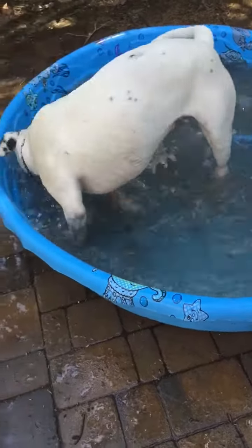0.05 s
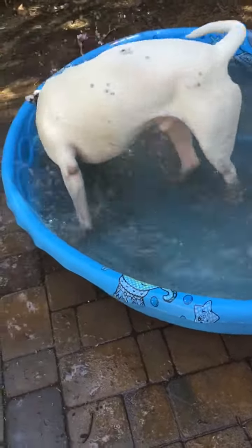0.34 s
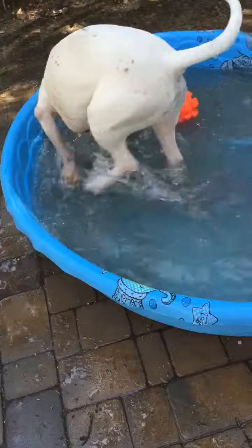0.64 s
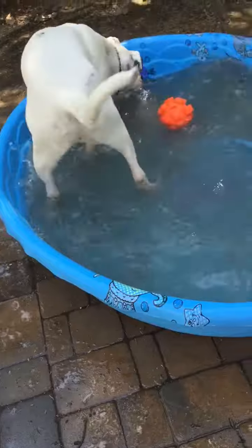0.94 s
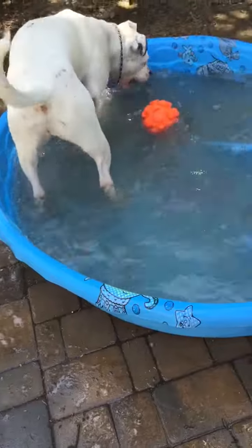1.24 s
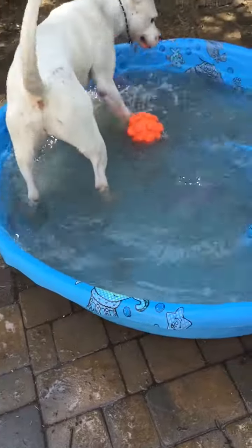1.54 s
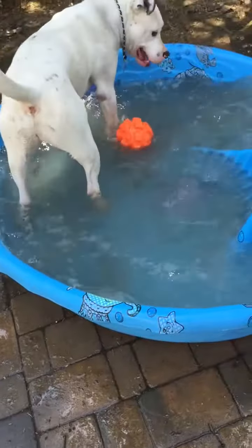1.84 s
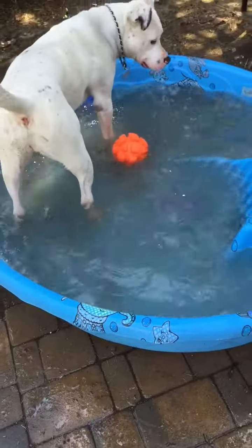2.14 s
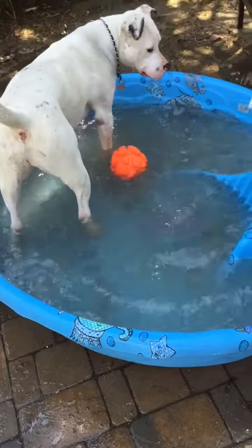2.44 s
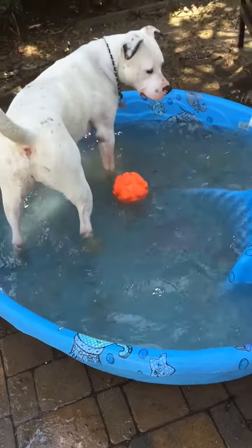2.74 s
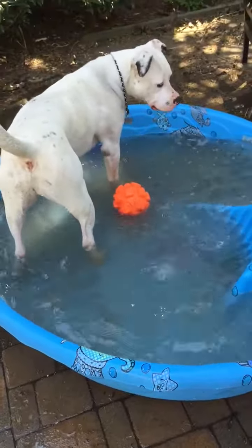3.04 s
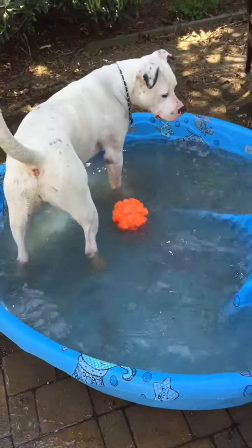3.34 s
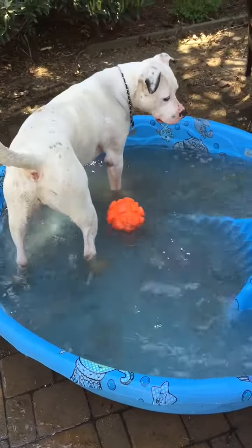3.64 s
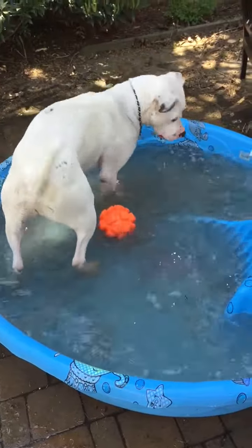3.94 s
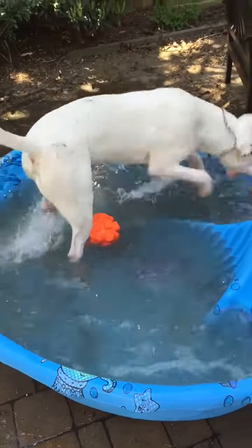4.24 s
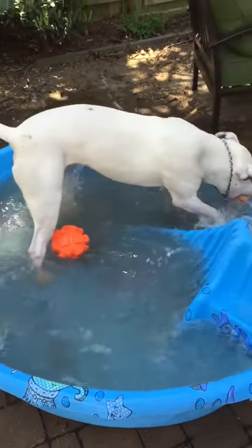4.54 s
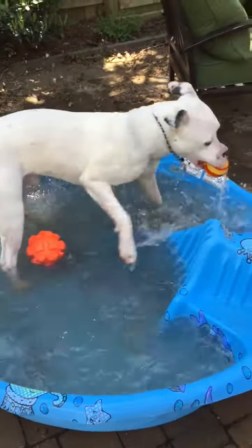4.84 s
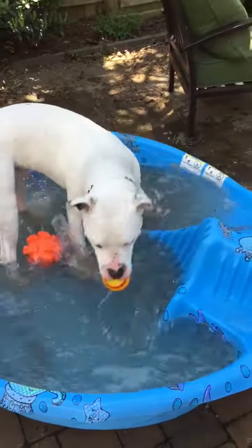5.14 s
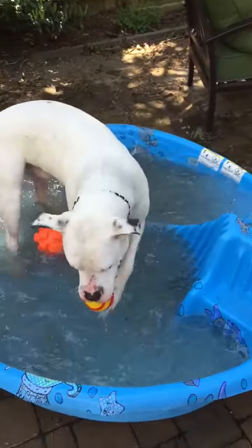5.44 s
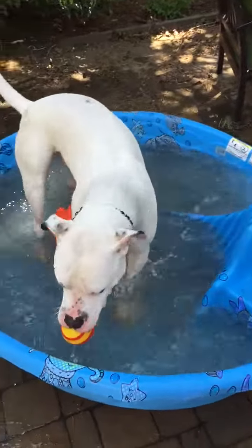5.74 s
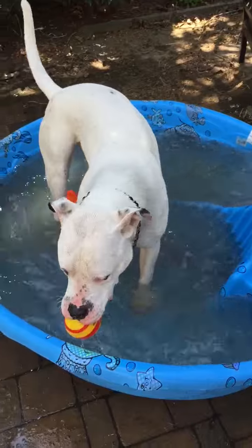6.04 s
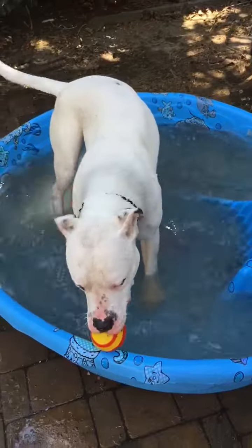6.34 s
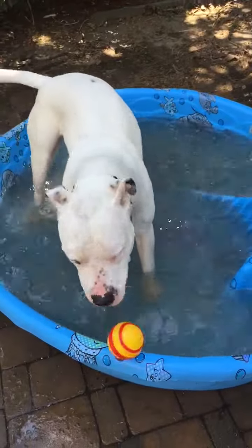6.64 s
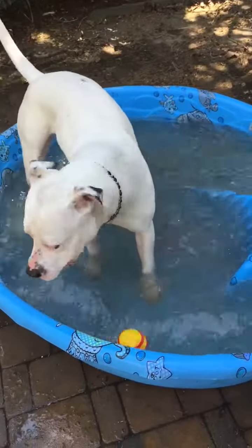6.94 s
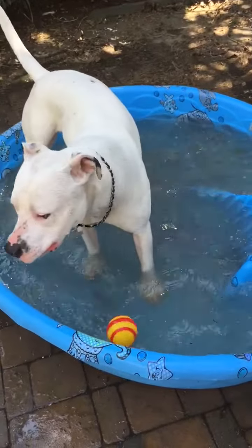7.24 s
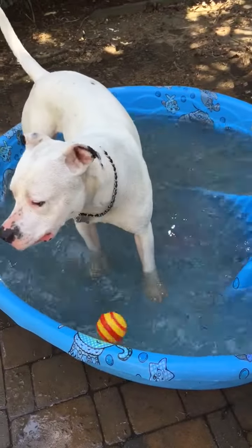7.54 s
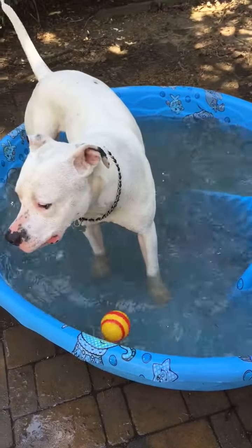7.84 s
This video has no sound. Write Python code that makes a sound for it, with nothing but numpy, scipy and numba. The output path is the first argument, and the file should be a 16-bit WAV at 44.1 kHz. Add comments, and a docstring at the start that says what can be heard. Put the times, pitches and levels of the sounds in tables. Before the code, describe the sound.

A dog wades and splashes in a plastic paddling pool, water sloshing, gurgling and dripping, with one loud lunge midway.

```python
"""A dog wades in a plastic paddling pool on a patio: its paws slap and plunge, and its legs churn up
ringing bubbles and spray. The water calms, leaving plinking drops and hollows that gurgle shut.
Just after four seconds the dog lunges for a ball and bumps the plastic, which booms. It lifts the ball
out dripping, its collar clinks twice, and the splashes fade as far-off birds call. All along, the pool
wall and the house give short echoes over a low outdoor rumble."""
import sys
import numpy as np
from scipy import signal
from scipy.fft import rfft, irfft
from scipy.io import wavfile
from scipy.ndimage import uniform_filter1d
from numba import njit

SR = 44100
rng = np.random.default_rng(int(sys.argv[2]) if len(sys.argv) > 2 else 0)


def file_out(sig):
    """Save sig as 16-bit WAV at sys.argv[1]."""
    # one column per channel
    cols = np.atleast_2d(sig).T
    # limit, then scale
    lim = np.clip(cols, -1, 1)
    pcm = np.round(lim * 32767).astype(np.int16)
    wavfile.write(sys.argv[1], SR, pcm)


N = 347508
TIME = np.arange(N) / SR


def churn(slosh_db=1.5, linger_db=-12, calm_db=(-74, -62, -77)):
    """Wading stirs up middling bubbles (babble), big ones (gulps) and tiny ones (spray), all together."""
    slosh = slosh_db * coloured_noise([(1, 0), (12, 0), (30, -8), (80, -40), (300, -90)])
    surge = from_db(stroke_levels(fall_db_per_s=142))
    lingering = from_db(linger_db + stroke_levels(fall_db_per_s=43))
    lapping = from_db(calm_db)[:, None]   # the babble, gulps and spray that go on between strokes
    babble_db, gulp_db, spray_db = 10 * np.log10(surge ** 2 + lingering ** 2 + lapping ** 2) + slosh
    gulps = bubble_cloud(gulp_db, 145.2, 696, per_s=470, cycles=23.6, rise=0.51,
                         spread_db=3, thinning=0.37, wash_db=-9, smooth_s=0.053, count=6000)
    babble = bubble_cloud(babble_db, 703, 4127, per_s=2600, cycles=37.3, rise=0.754,
                          spread_db=3.5, thinning=0.27, wash_db=-8.5, smooth_s=0.43, count=30000)
    spray = bubble_cloud(spray_db, 4050, 15390, per_s=5000, cycles=81, rise=0.14,
                         spread_db=5, thinning=0.6, wash_db=-1.5, smooth_s=0.18, count=60000)
    return from_db(-2.5) * gulps + from_db(-0.18) * babble + spray


# A leg or the muzzle sweeps through the water. Each row: start in seconds, length in seconds,
# babble level in dB, gulps in dB above the babble, spray in dB above the babble.
STROKES = [(-0.02, 0.054, -33.5, 0.5, -9), (0.095, 0.2, -39, -12.5, -8.5), (0.266, 0.2, -39, -2, -9.5),
           (0.511, .28, -39.5, -2.5, -9.5), (0.752, .25, -38, -4.5, -6.5), (1.044, 0.14, -45.5, 5.5, -7.5),
           (1.247, 0.29, -49.5, 1.5, -8), (1.534, 0.081, -43, -23, -7), (1.635, 0.059, -40.5, 0.5, -17),
           (1.826, 0.087, -71, 16.5, -30), (2.209, 0.084, -50.5, 3, -10), (2.363, 0.062, -57, 7.5, -12.5),
           (2.427, 0.062, -59.5, 0, -12), (2.896, 0.16, -62.5, 5, -6.5), (3.155, 0.033, -82, 9, -20),
           (3.939, 0.084, -56.5, 9.5, -16.5), (4.103, 0.15, -39.5, -12.5, -15), (4.23, 0.23, -37, -13, -5),
           (4.362, .06, -37, 6.5, -11), (4.462, 0.071, -32.5, 2, -9), (4.544, .09, -41.5, 5.5, -3.5),
           (4.666, 0.36, -41, -15, -5.5), (5.044, .12, -41, -1, -5.5), (5.197, .03, -46, -7, 0),
           (5.248, 0.15, -47.5, -1.5, -6.5), (5.433, 0.24, -45.5, -1, -2.5), (5.743, 0.11, -46, -7, -4.5),
           (5.926, 0.1, -50.5, -9, -4.5), (6.125, .08, -54, 1, -7.5), (6.47, 0.039, -65.5, 14, -19),
           (7.103, 0.28, -65.5, 0, -6), (7.613, .15, -69, 11, -13)]

def stroke_levels(fall_db_per_s, froth_s=0.023):
    """Babble, gulp and spray levels in dB: the water froths up, is fed by the stroke, then dies down."""
    power, coarse_time = 0, TIME[::40]
    for start, length, db, gulp_db, spray_db in STROKES:
        t = coarse_time - start
        swell = np.clip(t / froth_s, 0, 1) * from_db(-fall_db_per_s * np.maximum(t - length, 0))
        power = power + np.outer(from_db([db, db + gulp_db, db + spray_db]), swell) ** 2
    return np.array([np.interp(TIME, coarse_time, 10 * np.log10(row + 1e-14)) for row in power])


# The tone of churned water, from bass to treble. Each row: frequency in Hz, relative level in dB.
WATER_TONE = [(150, 7), (220, 1), (330, 5.5), (500, 0.5), (700, -6.5), (1100, -2), (1700, -4), (2900, -5.5),
              (4200, -13), (6300, -16.5), (7600, -21), (9200, -18), (10400, -23), (12000, -18.5),
              (15000, -23.5)]

def bubble_cloud(level_db, low_hz, high_hz, per_s, cycles, rise,
                 spread_db, thinning, wash_db, smooth_s, count):
    """Random bubbles ring over a wash of countless fainter ones; calmer water makes fewer."""
    when, pitch, luck, size, damping, climb, sign = rng.random((count, 7)).T
    start, hz = when * N / SR, low_hz * (high_hz / low_hz) ** pitch
    calmness_db = level_db.max() - level_db
    rate = per_s * from_db(-thinning * np.interp(start, TIME, calmness_db))
    born = luck < rate * N / SR / count
    bubble_db = db_at_hz(WATER_TONE, hz) + spread_db * np.minimum(-np.log(size), 5)
    # small bubbles ring only briefly, so they need more height to be as strong
    height = np.sign(sign - .5) * hz * from_db(bubble_db)
    ring_cycles = cycles * 2 ** (2 * damping - 1)
    octaves = rise * (2 * climb - .5)
    ringing = rms_one(bubbles(N, start[born], height[born], hz[born], ring_cycles[born], octaves[born]))
    # even out the cloud, so that level_db shapes its loudness
    window = int(smooth_s * SR)
    power = uniform_filter1d(uniform_filter1d(ringing ** 2, window), window)
    ringing = ringing / np.sqrt(np.abs(power) + 1e-5)
    wash = rms_one(band(coloured_noise(WATER_TONE), low_hz, high_hz, order=4))
    share = from_db(wash_db + 0.2 * calmness_db)   # in calm water the smooth wash takes over
    return from_db(level_db) * (ringing + share * wash) / np.sqrt(1 + share ** 2)


@njit
def bubbles(length, start, size, hz, cycles, rise_octaves):
    """Each bubble swells, fades 60 dB over its cycles and rises in pitch as it nears the surface."""
    out = np.zeros(length)
    for k in range(len(start)):
        first, life = int(start[k] * SR), max(int(cycles[k] / hz[k] * SR), 4)
        phase, step = 0., 2 * np.pi * hz[k] / SR
        height, fade = size[k], np.exp(-6.9 / life)
        shut, opening = 1., np.exp(-2.5 * hz[k] / SR)
        climb = 2 ** (rise_octaves[k] / life)
        for i in range(max(first, 0), min(first + life, length)):
            phase += step
            shut *= opening
            out[i] += height * (1 - shut) * np.sin(phase)
            height *= fade
            step = min(step * climb, 2.8)
    return out


# Paws and muzzle slap the surface. Each row: start in seconds, relative level in dB,
# main pitch in Hz, relative level of the spray in dB.
SLAPS = [(0.003, -21, 643, -23.5), (0.017, -23, 1060, -25), (0.308, -21, 980, -18), (0.424, -17, 945, -45),
         (0.843, -23.5, 782, -21.5), (0.895, -17, 2330, -27), (0.946, -18.5, 990, -47),
         (1.128, -14.5, 975, -34.5), (1.651, -28, 2100, -34), (1.665, -20.5, 840, -25),
         (1.695, -30, 1260, -19), (2.232, -31, 1340, -28), (2.263, -33.5, 1110, -15.5),
         (2.478, -34, 1690, -28), (2.948, -43, 1500, -30), (4.259, -34, 845, -27), (4.37, -15.5, 1040, -29),
         (4.482, -18, 565, -35), (4.504, -20, 570, -36), (4.789, -23, 1170, -26.5), (5.078, -27, 1250, -30),
         (5.091, -18.5, 1450, -27.5), (5.127, -12.5, 2430, -29.5), (5.143, -18.5, 820, -29),
         (5.669, -13.5, 1303, -26.5), (6.211, -35, 790, -27), (7.053, -45, 2900, -9)]

def slaps(burst_s=0.02, cycles=8.1, spray_cycles=3.45, count=30, spray_count=300):
    """A slap traps one big bubble, bursts into a cluster round that pitch and throws a puff of spray."""
    out, main = np.zeros(N), np.arange(count) == 0
    for start, db, hz, spray_db in SLAPS:
        when, size, pitch, climb = rng.random((4, count)) * ~main
        sizes = from_db(3 * main - 14.3 * size) * np.exp(-.6 * when) * rng.choice([-1, 1], count)
        pitches = hz * 2 ** (0.756 * np.tan(2.3 * (pitch - .5)) * ~main)
        body = bubbles(SR // 6, burst_s * when, sizes, pitches, np.full(count, cycles), .5 * climb)
        body = band(body, 0.84 * hz, 9800)   # little sounds below the biggest bubble
        # the spray swells just after the hit and rains down for longer
        delays = burst_s * rng.gamma(2, .5, spray_count)
        sizes = rng.normal(0, 1, spray_count)
        pitches = 2200 * 6 ** rng.random(spray_count)
        spray = bubbles(SR // 6, delays, sizes, pitches,
                        np.full(spray_count, spray_cycles), np.zeros(spray_count))
        slap = peak_one(body) + from_db(spray_db + 19.5) * peak_one(spray)
        add(out, start, from_db(db - 2.5) * slap)
    return out


# A leg pushes air under water. Each row: start in seconds, relative level in dB, pitch in Hz,
# number of cycles it rings for.
PLUNGES = [(0.128, -27, 310, 9.9), (0.29, -23.5, 566, 26), (0.384, -21.5, 396, 15), (0.425, -15, 380, 7.6),
           (0.513, -17, 626, 11), (0.572, -20.5, 636, 15), (0.655, -23.5, 507, 11),
           (0.945, -16.5, 520, 5.5), (0.981, -19, 491, 31), (1.113, -22.5, 522, 27),
           (1.144, -24.5, 232, 16), (1.325, -30, 234, 13), (1.644, -26.5, 310, 8.4), (1.831, -32, 324, 39),
           (2.355, -28.5, 204, 7), (3.189, -36.5, 370, 16), (3.986, -30.5, 268, 15), (4.38, -10, 496, 13),
           (4.387, -10, 276, 9), (4.415, -19.5, 288, 6.4), (4.564, -15.5, 348, 17), (5.083, -25.5, 576, 25),
           (5.114, -19, 384, 7.2), (5.139, -18.5, 450, 5), (5.309, -29.5, 600, 17), (5.483, -37, 158.6, 21),
           (5.581, -29, 453, 30), (5.667, -27.5, 152, 9.5), (6.509, -38.5, 195, 16), (7.252, -42, 165, 11),
           (7.451, -34, 115, 6.6)]

def plunges(shed_db=-10, shed_s=0.018, count=5):
    """A big air pocket booms, then sheds a few weaker bubbles."""
    out, shed = np.zeros(N), np.arange(count) > 0
    for start, db, hz, cycles in PLUNGES:
        when, pitch = rng.random((2, count))
        pitches = hz * 2 ** ((1.6 * pitch - .5) * shed)
        pocket = bubbles(SR // 5, shed_s * when * shed, from_db(shed_db * shed), pitches,
                         np.full(count, float(cycles)), np.full(count, .25))
        add(out, start, from_db(db - 3.5) * peak_one(pocket))
    return out


# The lunge knocks against the pool. Each row: start in seconds, peak level in dB.
BUMPS = [(4.38, -20), (4.387, -19), (4.399, -13.5), (4.568, -21)]
# The notes of the plastic. Each row: pitch in Hz, relative level in dB, seconds to fade by 60 dB.
PLASTIC_NOTES = [(87, -21.5, 0.6), (137, -4, 0.137), (197.5, -3, 0.31), (236, -19, 0.19), (303, -11, 0.25),
                 (392, -13, 0.088), (425, -9, 0.18), (524, -16, .15)]

def pool_bumps():
    """Each bump sets the water-filled plastic shell booming briefly."""
    out, t = np.zeros(N), TIME[:SR // 2]
    for start, db in BUMPS:
        boom = 0
        for k, (hz, note_db, ring_s) in enumerate(PLASTIC_NOTES):
            fade = from_db(note_db + rng.normal(0, 0.92) - 60 * t / ring_s)
            boom += (-1) ** k * fade * np.sin(2 * np.pi * hz * t)
        add(out, start, from_db(db) * peak_one(boom))
    return out


# Drops fall into the water. Each row: start in seconds, relative level in dB, pitch in Hz.
DROPS = [(0.598, -21.5, 2240), (1.161, -25.5, 2310), (1.582, -24.5, 1340), (1.81, -30, 1570),
         (1.837, -32.5, 1615), (1.898, -36.5, 2830), (2.13, -41.5, 1420), (2.21, -37, 4100),
         (2.321, -36, 1070), (2.342, -36.5, 2460), (2.385, -39.5, 975), (2.481, -42.5, 2080),
         (2.587, -36, 2060), (2.765, -39.5, 2470), (3.01, -39, 3370), (3.035, -37, 2720),
         (3.168, -41, 1330), (3.556, -36, 3170), (4.096, -21, 1980), (4.322, -27, 2430), (4.715, -22, 1140),
         (4.955, -31.5, 1040), (5.391, -23.5, 3250), (5.46, -24.5, 3250), (5.489, -23, 2980),
         (5.716, -20, 2400), (5.899, -33, 1700), (6.155, -35.5, 2430), (6.187, -28, 3600),
         (6.278, -25, 2700), (6.414, -33, 2080), (6.902, -40.5, 1830), (7.751, -39, 2740),
         (7.847, -41, 1650)]

def drops(cycles=57, rise_octaves=0.34, tick_s=0.0003):
    """Each drop ticks on the surface and traps one bubble that plinks and rises."""
    out, t = np.zeros(N), TIME[:SR // 5]
    for start, db, hz in DROPS + coat_drips(884, 3370, above_db=2.5, spread_db=0, count=90):
        plink = bubbles(len(t), *np.array([[0.], [1], [hz], [cycles], [rise_octaves]]))
        tick = band(rng.standard_normal(len(t)) * np.exp(-t / tick_s), hz, 3.2 * hz)
        plop = peak_one(plink) + from_db(-1.5) * peak_one(tick)
        plop = band(plop, 0.37 * hz, 2.5 * hz)   # the soft surface rounds off the hit
        add(out, start, from_db(db - 4) * plop)
    return out


# Flung droplets land on plastic and stone. Each row: start in seconds, relative level in dB, pitch in Hz.
SPATTER = [(1.002, -25.5, 5540), (1.868, -32.5, 12300), (1.969, -43, 6570), (2.073, -42, 5600),
           (2.13, -40, 6450), (2.188, -33.5, 6900), (2.205, -29, 4570), (2.274, -25, 7800),
           (2.41, -40.5, 4520), (2.446, -39.5, 9280), (2.93, -42, 9000), (3.529, -47.5, 4560),
           (4.134, -24.5, 4200), (4.838, -17, 9900), (5.324, -27, 5500), (5.494, -25.5, 7700),
           (5.53, -22, 5800), (5.716, -30, 6600), (6.189, -36.5, 5800), (6.214, -34, 6800),
           (6.277, -33.5, 5200), (7.052, -34, 11200), (7.066, -31, 12000), (7.196, -41, 8140),
           (7.283, -40.5, 5030), (7.335, -39, 11300), (7.52, -44, 10800), (7.728, -37, 12400)]

def spatter(cycles=104, half_width_octaves=0.44):
    """Droplets burst with a short bright tick, each round a pitch of its own."""
    out, t = np.zeros(N), TIME[:SR // 25]
    for start, db, hz in SPATTER + coat_drips(4300, 10300, above_db=10.5, spread_db=19, count=45):
        burst = rng.standard_normal(len(t)) * from_db(-60 * t * hz / cycles)
        tick = band(burst, hz / 2 ** half_width_octaves, hz * 2 ** half_width_octaves)
        add(out, start, from_db(db - 1) * peak_one(tick))
    return out


def coat_drips(low_hz, high_hz, above_db, spread_db, count):
    """The wet coat drips at random, more weakly as it drains. Gives rows of start, level and pitch."""
    when, size, pitch = rng.random((count, 3)).T
    start, hz = when * N / SR, low_hz * (high_hz / low_hz) ** pitch
    wet_db = np.interp(start, TIME, stroke_levels(fall_db_per_s=23.5)[0])
    return list(zip(start, wet_db + above_db - spread_db * size, hz))


# Hollows in the water close or open. Each row: start in seconds, peak level in dB, first pitch in Hz,
# last pitch in Hz, length in seconds.
GURGLES = [(0.002, -26.5, 535, 1260, 0.04), (0.39, -27, 401.5, 520, 0.055), (0.762, -34, 793, 1300, 0.045),
           (1.125, -20.5, 1140, 910, 0.0073), (2.808, -36, 857, 1340, 0.032),
           (2.946, -27.5, 1630, 1150, 0.0058), (3.136, -48.5, 1060, 1460, 0.051),
           (3.559, -45.5, 1094, 1070, 0.026), (3.937, -38, 1565, 2350, 0.019),
           (4.063, -30.5, 1830, 930, 0.018), (4.149, -29.5, 1550, 844, 0.0194), (4.265, -26, 916, 500, .05),
           (5.593, -27, 563, 900, 0.012), (6.376, -31.5, 2370, 3600, 0.0096),
           (6.673, -39.5, 580, 650, 0.038), (6.695, -36.5, 1347, 2650, 0.038)]

def gurgles(roughness=0.26, closing_curve=2.19, opening_curve=0.7, attack_s=0.00037):
    """A closing hollow sings upward faster and faster; an opening one drops at once, then settles."""
    out = np.zeros(N)
    for start, db, first_hz, last_hz, length in GURGLES:
        flutter = rms_one(band(rng.standard_normal(SR // 5), 21, 550))
        progress = np.linspace(0, 1, int(length * SR))
        curve = closing_curve if last_hz > first_hz else opening_curve
        hz = first_hz * (last_hz / first_hz) ** (progress ** curve)
        swell = 1 - np.exp(-progress * length / attack_s)
        fade = np.sqrt(1 - progress) * np.exp(-0.19 * progress ** 2)
        tone = (1 + roughness * flutter[:len(hz)]) * np.sin(2 * np.pi * np.cumsum(hz) / SR)
        add(out, start, from_db(db) * peak_one(swell * fade * tone))
    return out


# The collar clinks. Each row: start in seconds, level in dB.
CLINKS = [(5.215, -34), (5.813, -41)]
# The notes of its buckle. Each row: pitch in Hz, relative level in dB, seconds to fade by 60 dB.
BUCKLE_NOTES = [(7940, -15, 0.39), (14340, -3, 0.11), (15100, -13, 0.1)]

def collar():
    """The metal buckle rings high and thin when the neck swings."""
    out, t = np.zeros(N), TIME[:SR // 2]
    ring = sum(from_db(db - 60 * t / ring_s) * np.sin(2 * np.pi * hz * t)
               for hz, db, ring_s in BUCKLE_NOTES)
    for start, db in CLINKS:
        add(out, start, from_db(db) * ring)
    return out


def patio_echoes(sound, wall_s=0.0038, rim_s=0.011, tail_s=0.19):
    """Two quick echoes come off the pool wall, with a thin dull scatter from house and fence."""
    t = TIME[:SR // 2]
    tail = band(rng.standard_normal(len(t)), 107, 3700, order=1)
    tail *= from_db(-60 * t / tail_s) * (1 - np.exp(-t / 0.0014))
    echo = from_db(-17) * tail / np.sqrt(np.sum(tail ** 2))
    # the low soft wall returns neither bass nor the highest treble
    bounce = band(signal.unit_impulse(SR // 20), 530, 6500, order=1)
    add(echo, wall_s, from_db(-17) * bounce)
    add(echo, rim_s, from_db(-18.5) * bounce)
    return sound + signal.fftconvolve(sound, echo)[:N]


# The tone of the outdoor background. Each row: frequency in Hz, relative level in dB.
AIR_TONE = [(15, -56), (26, -21), (36, -3.5), (60, 1), (90, 5.5), (130, -2), (190, -8), (280, -18),
            (420, -16), (650, -23.5), (1100, -21), (2000, -33), (5000, -46), (15000, -48.5)]

def outdoor_air(level_db=-51):
    """A steady low rumble with a faint hiss."""
    return from_db(level_db) * coloured_noise(AIR_TONE)


# Far-off birds call. Each row: start in seconds, length in seconds, pitch in Hz, pitch spread in Hz,
# level in dB.
BIRD_NOTES = [(2.705, 0.17, 3760, 600, -65), (7.093, 0.15, 4160, 270, -61.5), (7.513, .3, 5150, 14, -70.5),
              (7.576, .15, 3540, 500, -63), (7.605, 0.17, 4180, 230, -62.5), (7.803, 0.21, 6980, 20, -66)]

def birds():
    """Thin notes arrive blurred by distance: each is a narrow band of noise that swells and fades."""
    out = np.zeros(N)
    for start, length, hz, width_hz, db in BIRD_NOTES:
        noise = band(rng.standard_normal(SR), hz - width_hz / 2, hz + width_hz / 2)
        note = rms_one(noise[-int(length * SR):])
        add(out, start, from_db(db) * note * np.sin(np.linspace(0, np.pi, len(note))))
    return out


def from_db(db):
    """Turn decibels into a number to multiply by."""
    return 10 ** (np.asarray(db) / 20)


def rms_one(x):
    """Scale to an average strength (rms) of 1."""
    return x / np.sqrt(np.mean(x ** 2) + 1e-20)


def peak_one(x):
    """Scale to a peak of 1."""
    return x / (np.abs(x).max() + 1e-12)


def db_at_hz(tone, hz):
    """Read a level between the rows of a tone table, with octaves evenly spaced."""
    row_hz, row_db = np.transpose(tone)
    return np.interp(np.log(np.maximum(hz, 1)), np.log(row_hz), row_db)


def coloured_noise(tone):
    """Steady noise shaped by a tone table, with an average strength of 1."""
    hz = np.arange(N // 2 + 1) * SR / N
    return rms_one(irfft(rfft(rng.standard_normal(N)) * from_db(db_at_hz(tone, hz)), N))


def band(x, low_hz, high_hz, order=2):
    """Let through what lies between two frequencies."""
    sos = signal.butter(order, [low_hz, min(high_hz, SR * .45)], "band", fs=SR, output="sos")
    return signal.sosfilt(sos, x + 1e-18)


def add(out, start, sound):
    """Mix a sound in at a start time in seconds."""
    i = int(np.clip(round(start * SR), 0, N - 1))
    out[i:i + len(sound)] += sound[:N - i]


def scene():
    """The dog and the water echo on the patio, over the outdoor background."""
    pool = churn() + slaps() + plunges() + pool_bumps() + drops() + spatter() + gurgles() + collar()
    return (patio_echoes(pool) + outdoor_air() + birds())[None]


def record(dry, cutoff_hz=15450):
    """The highest treble is cut off steeply."""
    return signal.sosfilt(signal.ellip(10, .2, 70, cutoff_hz, fs=SR, output="sos"), dry)


dry = scene()
out = record(dry)
file_out(out)
```